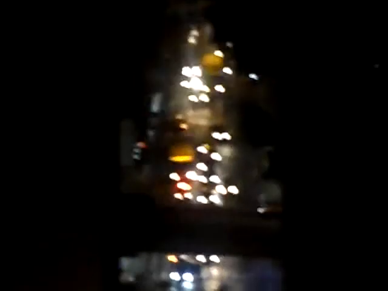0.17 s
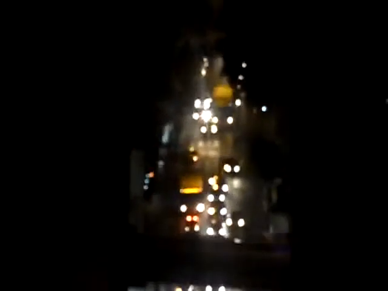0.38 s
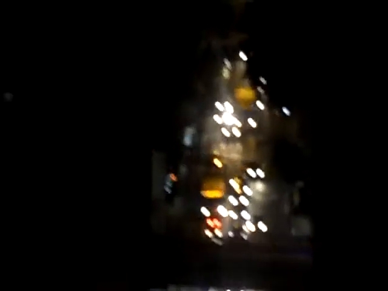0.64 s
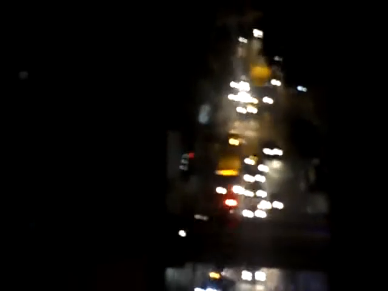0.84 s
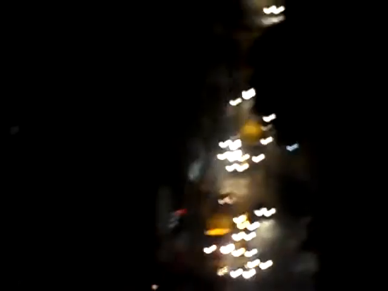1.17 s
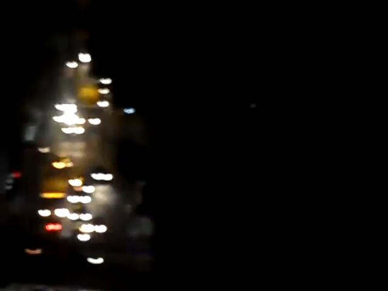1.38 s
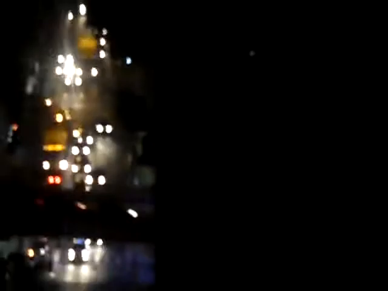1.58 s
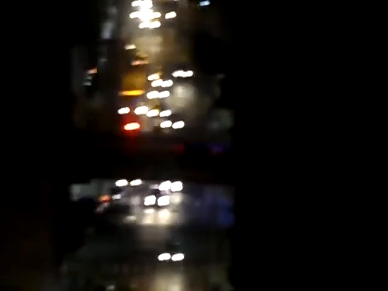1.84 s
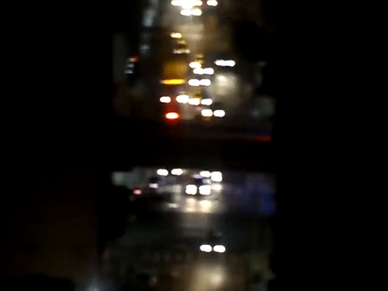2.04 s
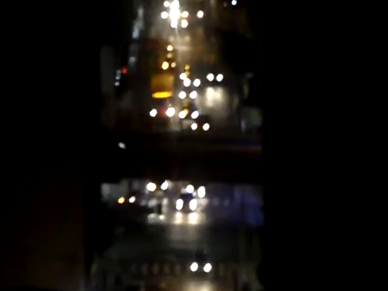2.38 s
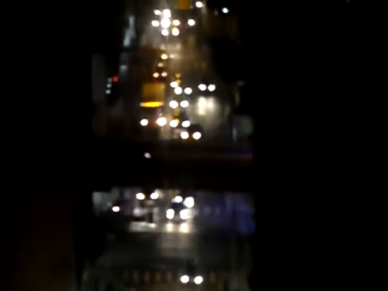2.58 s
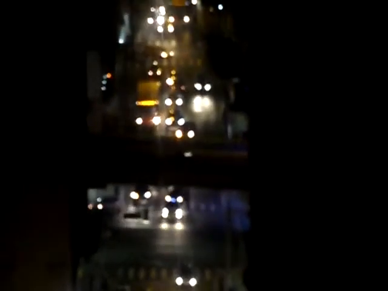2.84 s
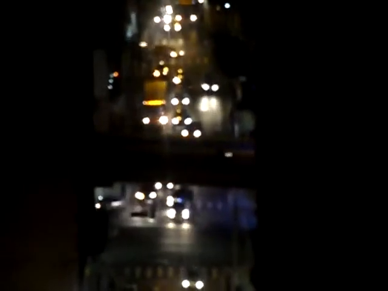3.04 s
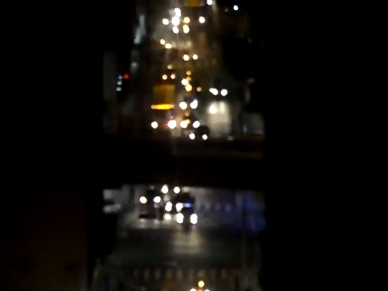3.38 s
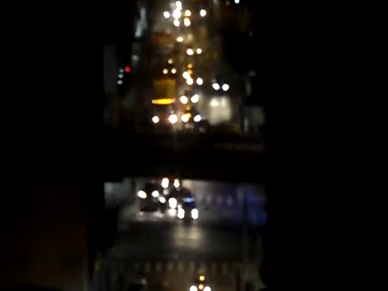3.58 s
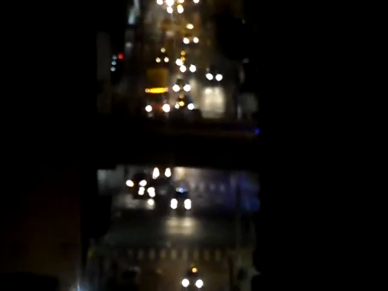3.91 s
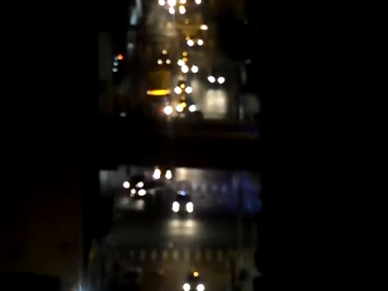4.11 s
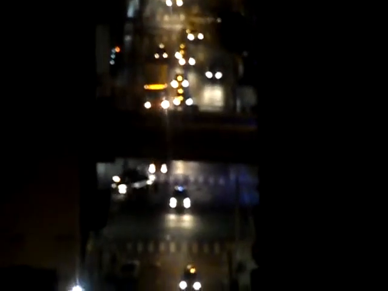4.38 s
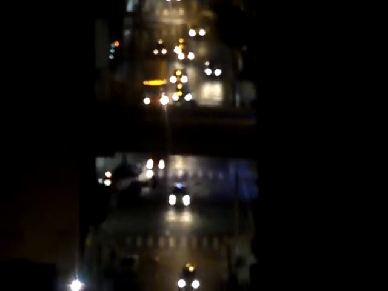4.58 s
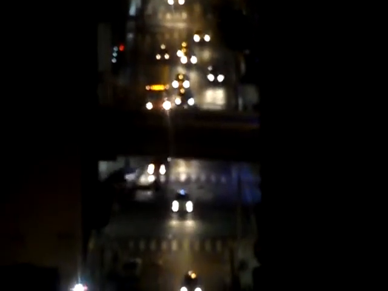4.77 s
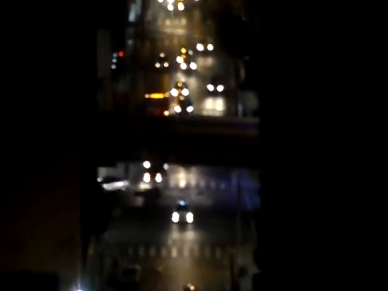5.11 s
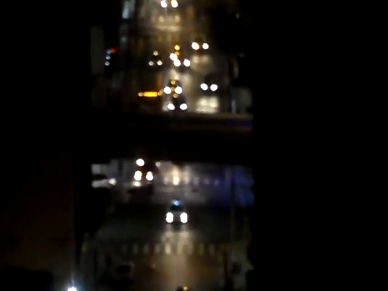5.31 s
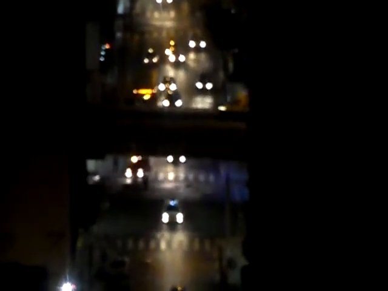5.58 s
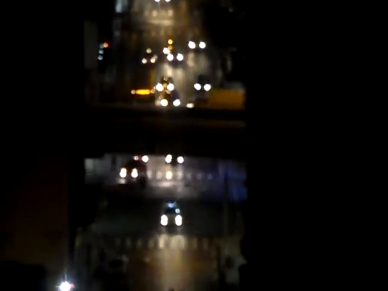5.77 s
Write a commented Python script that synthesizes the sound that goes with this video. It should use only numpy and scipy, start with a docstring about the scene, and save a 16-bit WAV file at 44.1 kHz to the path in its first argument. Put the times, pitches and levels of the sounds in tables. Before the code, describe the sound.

From high above a city street at night, a microphone picks up a low, muffled traffic rumble and faint hiss. Wind thumps against it early on, with small crackles and hollow knocks. Fingers then click and creak on the camera's case, thinning out to occasional soft bumps. The traffic grows gradually louder, and a single car hums by toward the end.

```python
"""Engines rumble and tyres wash on a busy avenue at night, far below a hand-held camera's microphone.
Gusts buffet the microphone as it swings; the input crackles, and the limiter ducks the street and
slowly lets it back. Close up, the hand bumps, rubs, clicks, knocks and creaks the camera's case.
The traffic slowly swells, and near the end one car drones past."""
import sys
import numpy as np
from scipy import signal
from scipy.fft import rfft, irfft, next_fast_len
from scipy.io import wavfile
from scipy.ndimage import uniform_filter1d, minimum_filter1d, map_coordinates

SR = 44100
rng = np.random.default_rng(int(sys.argv[2]) if len(sys.argv) > 2 else 0)


def transcribe(signal):
    """Save signal, clipped to [-1, 1], as a 16-bit WAV file at the path in sys.argv[1]."""
    frames = np.atleast_2d(signal).T
    limited = np.clip(frames, -1, 1)
    pcm = np.round(limited * 32767).astype(np.int16)
    wavfile.write(sys.argv[1], SR, pcm)


N = 261938

# distant engines, heard from high above: frequency_hz, density_db
ENGINE_SPECTRUM = [(12, -20), (30, -2), (60, 3), (78, -0.5), (95, 2), (130, -2), (165, -5), (205, -12.5),
                   (260, -16.5), (320, -16), (400, -17), (500, -23.5), (650, -41.5), (1200, -67)]
# single engines humming out of the rumble: pitch_hz, relative_db
ENGINE_HUMS = [(92, -13.5), (158, -13.5), (400, -25)]
# distant tyres on the road: frequency_hz, density_db
TYRE_SPECTRUM = [(250, -15), (480, -1.5), (630, 0), (850, 0), (1150, -6), (1900, -14.5), (2600, -28),
                 (4500, -59), (10000, -75)]
# the nearest car's firing harmonics at its closest, lowest first: level_db
DRONE_HARMONICS = [-35, -44, -45.5, -50.5]
# the nearest car's tyres: frequency_hz, density_db
SWISH_SPECTRUM = [(900, -14), (1400, 5), (1950, 12), (2600, -3), (4800, -7), (7000, -23)]
# low modes of the camera's case: pitch_hz, level_db, t60_s
CASE_MODES = [(268.5, -3.5, 0.15), (541, -15, 0.11)]
# the microphone's own noise: frequency_hz, density_db
HISS_SPECTRUM = [(200, -8), (2500, 10.5), (5000, 5.5), (9000, 3.5), (15500, 1.5)]
# slow swell of air on the microphone: frequency_hz, density_db
SWELL_SPECTRUM = [(3, -21.5), (7, 6.5), (12, 3), (22, -3), (40, -41), (150, -89)]
# faster buffeting on the microphone: frequency_hz, density_db
BUFFET_SPECTRUM = [(12, 1.5), (30, 4), (60, 0.5), (110, -15), (250, -30), (600, -58.5), (2000, -95)]
# swings of the microphone through the air: start_s, length_s, swell_db, buffet_db
MIC_SWINGS = [(0.053, 0.24, -15.5, -22), (0.277, 0.25, -23, -26.5), (0.794, 0.07, -24.5, -22),
              (0.92, 0.13, -19.5, -15.5), (1.173, 0.21, -7, -12.5), (1.55, 0.13, -14, -26.5),
              (1.854, 0.066, -17.5, -18.5)]
# the hardest gusts: centre_s, peak_db, half_length_s
HARD_GUSTS = [(0.055, -12.5, 0.0081), (0.939, -1.5, 0.015), (1.035, -0.5, 0.017), (1.128, 10, 0.013),
              (1.189, -2, 0.018), (1.384, -5, 0.02), (1.427, 0, 0.019), (1.492, -2, 0.013),
              (1.641, -3.5, 0.02), (1.715, -11.5, 0.01), (1.905, 1.5, 0.012)]
# soft bumps of the hand: centre_s, level_db, pitch_hz, relative_ring_db
HAND_BUMPS = [(0.163, -15.5, 66.6, -24), (0.471, -21, 67.4, -38), (0.939, -13, 90, -28),
              (0.989, -14, 55, -35), (1.1075, -22, 150, -32), (1.486, -16.5, 110, -20),
              (1.841, -23, 55, -33), (2.2, -16.5, 52.7, -22), (2.361, -23, 50, -25),
              (2.437, -21.5, 122, -18), (2.559, -24.5, 96.5, 0), (2.573, -18, 102, -26),
              (3.108, -19, 68, -8.5), (3.135, -22, 55, -28), (3.463, -16, 83, -4.5),
              (4.2889, -17.5, 130, -19), (4.305, -16.5, 146, -13.5), (5.423, -23.5, 123, -34),
              (5.456, -15, 126, -33)]
# fingers sliding on the shell: start_s, length_s, level_db, centre_hz, width_hz
FINGER_RUBS = [(0.207, 0.028, -53, 1100, 1200), (1.092, 0.018, -38, 517, 300),
               (1.574, 0.022, -52, 700, 1100), (1.725, 0.12, -61, 1600, 1500),
               (1.747, 0.06, -64, 8350, 3500), (1.937, 0.055, -52.5, 1450, 940),
               (2.178, 0.086, -48.5, 1120, 497), (2.18, 0.075, -64.5, 3400, 1800)]
# clicks of the shell: start_s, peak_db, t60_s, contact_hz
SHELL_CLICKS = [(0.212, -42, 0.012, 1930), (1.458, -36, 0.013, 990), (1.5187, -38, 0.0053, 2800),
                (1.585, -37.5, 0.025, 900), (1.897, -34.5, 0.013, 646), (2.042, -35, 0.017, 1092),
                (2.12, -44, 0.006, 1000), (2.176, -34, 0.021, 1400), (2.275, -38, 0.0073, 1186),
                (2.343, -44, 0.026, 1900), (2.418, -38.5, 0.01, 1490), (2.434, -39, 0.038, 1400),
                (2.517, -47.5, 0.015, 650), (2.573, -37.5, 0.013, 610), (2.611, -42.5, 0.008, 790)]
# bright resonances of the shell: centre_hz, width_hz, gain_db
SHELL_RESONANCES = [(705, 470, 9), (1250, 440, 12), (2380, 90, 3.5), (2650, 330, -4), (4600, 1400, -12)]
# dull knocks on the case: start_s, level_db, pitch_hz
KNUCKLE_KNOCKS = [(0.423, -32, 399), (0.938, -27, 280), (1.104, -12, 370), (1.482, -19.5, 262),
                  (1.528, -19.5, 357)]
# the input rasping at the crests of gusts: start_s, tooth_db, length_s, teeth_per_s
OVERLOAD_RASPS = [(0.915, -34, 0.0036, 2600), (1.02, -35.5, 0.0028, 3000), (1.056, -35, 0.0062, 1410),
                  (1.1108, -35, 0.0045, 1100), (1.414, -36.5, 0.002, 1670), (1.4823, -34.5, 0.001, 2200),
                  (1.891, -34.5, 0.002, 3000), (1.908, -35, 0.0094, 1870)]
# small sharp ticks, the sound of the limiter's gain stepping back up under loud bass: start_s, step_db
LIMITER_TICKS = [(0.956, -35), (1.049, -36), (1.1074, -34.5), (1.211, -45.5), (1.2691, -36), (1.281, -35.5),
                 (1.292, -38), (1.3047, -42), (1.314, -37), (1.351, -37.5), (1.398, -32.5), (1.478, -35),
                 (1.5023, -38), (1.5133, -37), (1.519, -34.5), (1.608, -39), (1.618, -37.5), (1.629, -36.5),
                 (1.677, -41.5), (1.711, -41), (1.873, -42), (1.932, -36)]
# the case creaking under the grip: start_s, level_db, length_s, slips_per_s, contact_hz
GRIP_CREAKS = [(2.31, -42, 0.004, 1250, 1300), (2.555, -46, 0.0063, 800, 1500),
               (3.105, -42, 0.0025, 1250, 1300), (3.1097, -42.5, 0.007, 1300, 1900),
               (3.13, -55, 0.015, 800, 1900), (3.459, -44, 0.008, 780, 2600)]
# what a creak rings in the case: centre_hz, width_hz, gain_db
CREAK_RESONANCES = [(1310, 250, 7.5), (2340, 200, 4.5), (2870, 220, -0.5), (4520, 500, -7.5),
                    (5500, 790, -12)]


def amp(db):
    """Decibels to gain."""
    return 10 ** (np.asarray(db) / 20)


def unit(x):
    """x at rms 1."""
    return x / np.sqrt(np.mean(x ** 2) + 1e-20)


def wobble(rate):
    """A smooth random curve, rate knots a second."""
    return map_coordinates(rng.standard_normal(int(N * rate / SR) + 4), [np.arange(N) * rate / SR])


def filtered(x, response):
    """x times a complex response of frequency."""
    size = next_fast_len(len(x) + SR // 2)
    return irfft(rfft(x, size) * response(np.fft.rfftfreq(size, 1 / SR)), size)[:len(x)]


def resonance(f, hz, width):
    """Causal response of one resonance."""
    return 1j * f * width / (hz * hz - f * f + 1j * f * width)


def body(f, resonances):
    """Response of several resonances, alternating in sign."""
    return sum((-1) ** k * amp(db) * resonance(f, hz, width)
               for k, (hz, width, db) in enumerate(resonances))


def rush(spectrum, patchy_db=0.0):
    """Coloured noise of rms 1 with patches of random gain."""
    cells = signal.stft(rng.standard_normal(N), nperseg=2048)[2]
    patches = uniform_filter1d(rng.standard_normal(cells.shape), size=5, axis=0)
    patches = uniform_filter1d(patches, size=9, axis=1)
    noise = signal.istft(cells * amp(patchy_db * unit(patches)))[1][:N]
    hz, db = np.transpose(spectrum)
    return unit(filtered(noise, lambda f: amp(np.interp(np.log(f + 1), np.log(hz), db))))


def add(track, start, sound):
    """Mix a sound into the track from start, in seconds."""
    part = track[round(start * SR):][:len(sound)]
    part += sound[:len(part)]


def avenue(approach_s=3.24, away_s=1.51, away_width_s=0.47):
    """Far below, engines and tyres blur between the house fronts and swell as they draw nearer."""
    t = np.arange(N) / SR
    far = np.exp(-t / approach_s)
    away = np.exp(-((t - away_s) / away_width_s) ** 2)  # the microphone points off the street
    engine_db = -29 - 6.5 * far - 8 * away
    tyre_db = -51 - 7 * far - 5.5 * away
    engines = amp(engine_db + 1.92 * wobble(11)) * rush(ENGINE_SPECTRUM)
    tyres = amp(tyre_db + 0.45 * wobble(9)) * rush(TYRE_SPECTRUM, patchy_db=2.0)
    for hz, db in ENGINE_HUMS:
        hum_gain = amp(engine_db + db + 2.6 * wobble(5.4))
        cycles = np.cumsum(hz * (1 + .03 * wobble(8))) / SR
        engines += hum_gain * np.sin(2 * np.pi * cycles)
    return engines + tyres


def near_car(firing_hz=97, closest_s=4.9, swish_s=4.58):
    """One car passes nearer the microphone: a wavering engine drone and a brief swish of tyres."""
    t = np.arange(N) / SR
    nearness = 1 / np.hypot(1, (t - closest_s) / 0.25)  # spreading with distance
    firings = np.cumsum(firing_hz * (1 + 0.02009 * wobble(3.7))) / SR
    drone = sum(amp(db + 1.2 * wobble(5)) * np.sin(2 * np.pi * order * firings)
                for order, db in enumerate(DRONE_HARMONICS, start=1))
    swell = np.exp(-((t - swish_s) / .16) ** 2)
    return nearness * drone + amp(-61.5) * swell * rush(SWISH_SPECTRUM)


def through_case(x):
    """Sound from the street rings the low modes of the case around the microphone."""
    modes = lambda f: sum(resonance(f, hz, np.log(1000) / (np.pi * t60)) for hz, _, t60 in CASE_MODES)
    return filtered(x, lambda f: 1 + amp(1.5) * modes(f))


def hiss():
    """The microphone's own noise floor."""
    return amp(-65.5) * rush(HISS_SPECTRUM, patchy_db=2.0)


def swing_db(start, length, settle_db_per_s, rise_db_per_s=128):
    """Level of the air in one swing of the microphone: rise, hold at 0 dB, settle."""
    t = np.arange(N) / SR - start
    return -rise_db_per_s * np.maximum(-t, 0) - settle_db_per_s * np.maximum(t - length, 0)


def wind():
    """Air swells and flutters on the swinging microphone; a hard gust is one push and one pull."""
    swell_db, buffet_db = -32.5, -31.5  # the light breeze under the swings
    for start, length, swell_top_db, buffet_top_db in MIC_SWINGS:
        swell_db = np.maximum(swell_db, swell_top_db + swing_db(start, length, settle_db_per_s=11))
        buffet_db = np.maximum(buffet_db, buffet_top_db + swing_db(start, length, settle_db_per_s=75))
    air = amp(swell_db) * rush(SWELL_SPECTRUM, patchy_db=2.0)
    air += amp(buffet_db) * rush(BUFFET_SPECTRUM)
    for centre, db, half_length in HARD_GUSTS:
        offset = (np.arange(N) / SR - centre) / half_length
        air -= amp(db) * offset * np.exp((1 - offset ** 2) / 2)
    return air


def bumps(ring_rise_s=0.0018):
    """A soft blow of the hand pushes the case in and out once and leaves its low modes ringing."""
    out, t = np.zeros(N), np.arange(SR // 3) / SR
    ring = sum(amp(db - 60 * t / t60) * np.sin(2 * np.pi * hz * t) for hz, db, t60 in CASE_MODES)
    ring *= 1 - np.exp(-t / ring_rise_s)
    for centre, db, hz, ring_db in HAND_BUMPS:
        phase = 2 * np.pi * hz * (np.arange(N) / SR - centre)
        out += amp(db) * 2 * phase / (1 + phase ** 2 / 2) ** 2
        add(out, centre, amp(db + ring_db) * ring)
    return out


def rubs(grain_db=3, grains_per_s=510):
    """Skin drags over the shell in fine grains, right by the microphone."""
    out = np.zeros(N)
    for start, length, db, hz, width in FINGER_RUBS:
        grains = rng.standard_normal(SR // 4) * amp(grain_db * wobble(grains_per_s)[:SR // 4])
        band = lambda f: resonance(f, hz, width) * resonance(f, hz, 1.5 * hz) / (1 + (f / (4 * hz)) ** 4)
        friction = unit(filtered(grains, band))
        stroke = signal.windows.tukey(round(length * SR), .5)
        add(out, start, amp(db) * stroke * friction[:len(stroke)])
    return out


def clicks(rise_s=0.002):
    """The shell slips under the grip: a rough burst rings its resonances; a softer contact is duller."""
    out, t = np.zeros(N), np.arange(SR // 5) / SR
    for start, db, t60, contact_hz in SHELL_CLICKS:
        slip = rng.standard_normal(len(t)) * amp(-60 * t / t60) * (1 - np.exp(-t / rise_s))
        click = filtered(slip, lambda f: body(f, SHELL_RESONANCES) * resonance(f, contact_hz, contact_hz))
        add(out, start, amp(db) * click / np.abs(click).max())
    return out


def knocks(rise_s=0.0011):
    """A knuckle meets the gripped case: a hollow note that swells and dies within a few cycles."""
    out, t = np.zeros(N), np.arange(SR // 20) / SR
    envelope = t / rise_s * np.exp(1 - t / rise_s)
    for start, db, hz in KNUCKLE_KNOCKS:
        add(out, start, amp(db) * envelope * np.sin(2 * np.pi * hz * t))
    return out


def crackles(tooth_scatter=0.2, decay_s=0.0029):
    """Sawteeth at set times: rasps of the overloaded input, ticks of the limiter's gain stepping up."""
    steps = np.zeros(N)
    for start, db, length, rate in OVERLOAD_RASPS:
        teeth = np.arange(max(1, round(length * rate)))
        times = start + (teeth + rng.uniform(-tooth_scatter, tooth_scatter, len(teeth))) / rate
        steps += amp(db) * np.bincount(np.round(times * SR).astype(int), minlength=N)
    for start, db in LIMITER_TICKS:
        steps[round(start * SR)] += amp(db)
    return signal.lfilter([1], [1, -np.exp(-1 / (decay_s * SR))], steps)


def squeak(start_s=1.695, length_s=0.115, level_db=-61, pitch_hz=2450, waver_hz=79.5):
    """A fingertip sings faintly on the shell, unsteady in pitch and strength."""
    out, stroke = np.zeros(N), signal.windows.tukey(round(length_s * SR), .2)
    cycles = np.cumsum(pitch_hz + waver_hz * wobble(300)) / SR
    tone = np.sin(2 * np.pi * cycles) * amp(4 * wobble(150))
    add(out, start_s, amp(level_db) * stroke * unit(tone)[:len(stroke)])
    return out


def creaks(slip_scatter=0.14, spread_db=1, width_hz=4300):
    """Plastic sticks and slips a few times in quick, nearly even succession, then stops dead."""
    out = np.zeros(N)
    for start, db, length, rate, contact_hz in GRIP_CREAKS:
        count = max(2, round(length * rate))
        gaps = np.abs(1 + slip_scatter * rng.standard_normal(count)) / rate
        sizes = amp(spread_db * rng.standard_normal(count))
        times = np.cumsum(gaps) - gaps[0]
        slips = np.bincount(np.round(times * SR).astype(int), sizes, minlength=SR // 20)
        creak = filtered(slips, lambda f: body(f, CREAK_RESONANCES) * resonance(f, contact_hz, width_hz))
        add(out, start, amp(db) * creak * np.sqrt(length * SR / np.sum(creak ** 2)))
    return out


def scene():
    """At one microphone: the street far below, wind and handling noise close up, and its own hiss."""
    street = through_case(avenue() + near_car())
    handling = bumps() + rubs() + clicks() + knocks() + squeak() + creaks()
    return (street + hiss() + wind() + handling)[None]


def limiter(x, ceiling_db, hold_s, release_s):
    """The gain falls at once on a peak, waits, and climbs back slowly."""
    t = np.arange(N) / SR
    needed = np.minimum(1, amp(ceiling_db) / (np.abs(x) + 1e-9))
    reach = int(hold_s * SR / 2)
    held = minimum_filter1d(needed, 2 * reach + 1, origin=reach, mode="nearest")
    duck = np.maximum.accumulate((1 - held) * np.exp(t / release_s)) * np.exp(-t / release_s)
    return x * uniform_filter1d(1 - duck, size=64)


def record(dry):
    """The camera limits the microphone's peaks, adds its crackles and cuts the highest treble."""
    top_hz = 15750
    limited = limiter(dry[0], ceiling_db=-4.2, hold_s=.11, release_s=.48)
    return filtered(limited + crackles(), lambda f: f < top_hz)[None]


dry = scene()
out = record(dry)
transcribe(out)
```